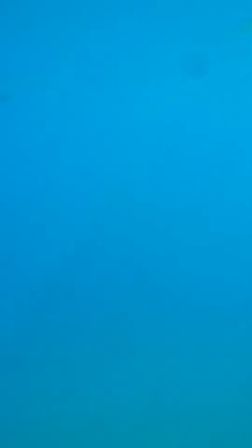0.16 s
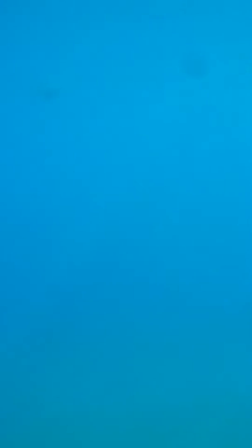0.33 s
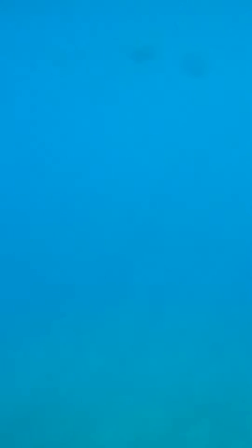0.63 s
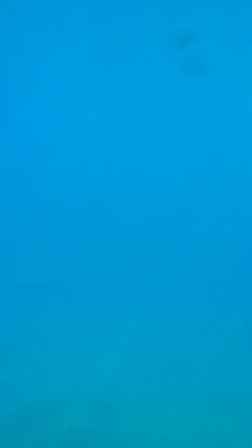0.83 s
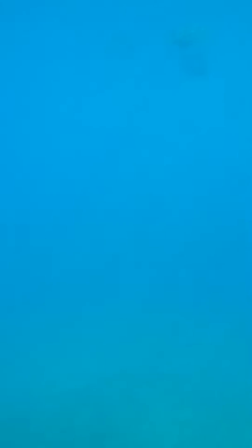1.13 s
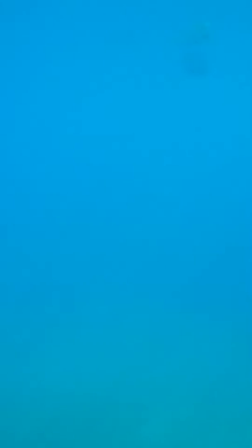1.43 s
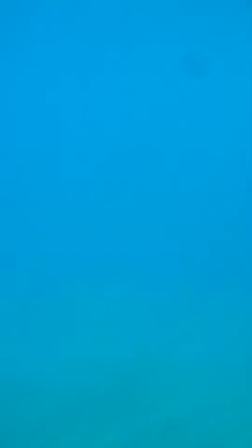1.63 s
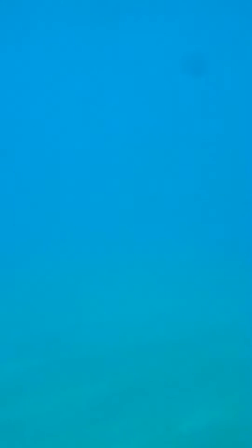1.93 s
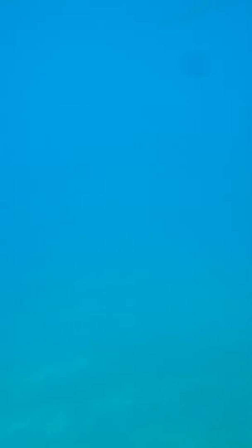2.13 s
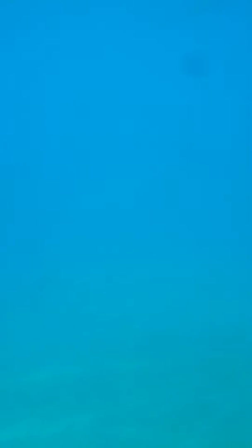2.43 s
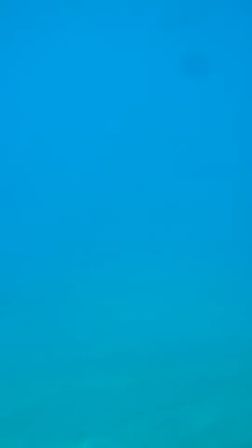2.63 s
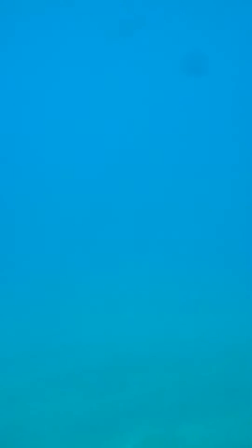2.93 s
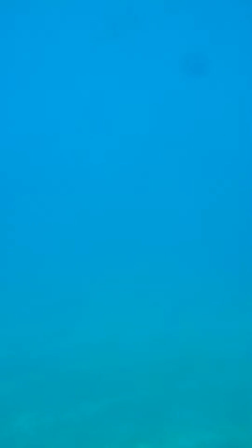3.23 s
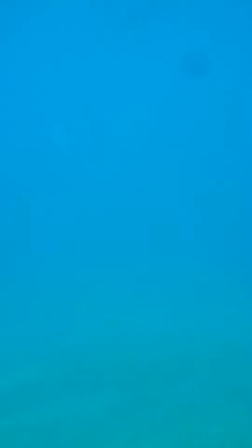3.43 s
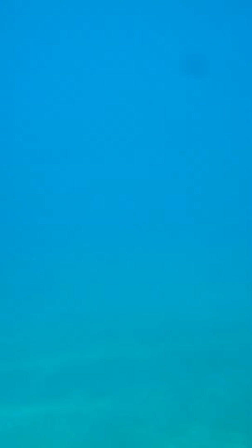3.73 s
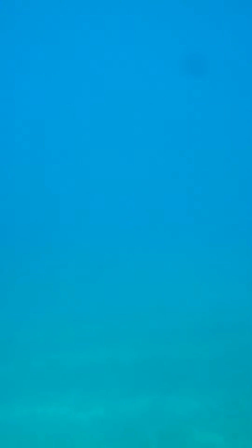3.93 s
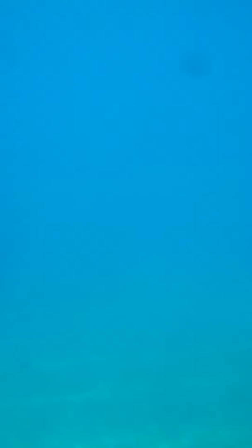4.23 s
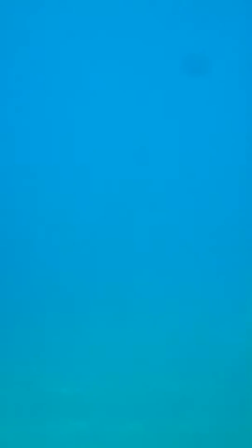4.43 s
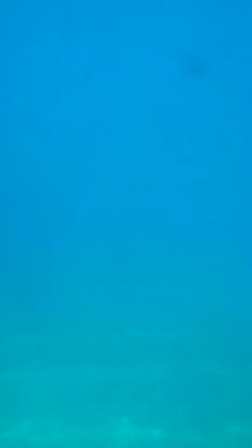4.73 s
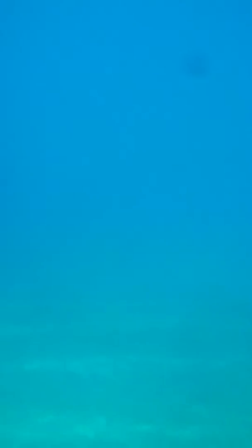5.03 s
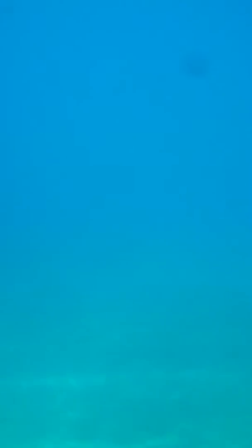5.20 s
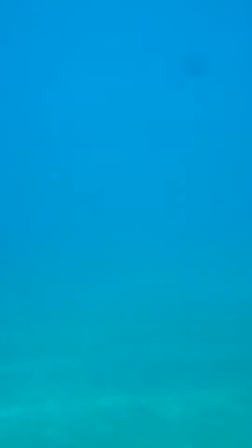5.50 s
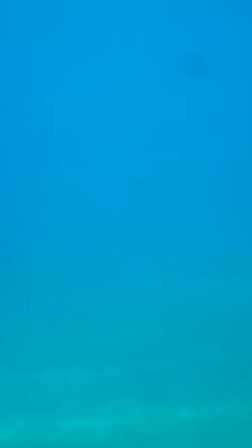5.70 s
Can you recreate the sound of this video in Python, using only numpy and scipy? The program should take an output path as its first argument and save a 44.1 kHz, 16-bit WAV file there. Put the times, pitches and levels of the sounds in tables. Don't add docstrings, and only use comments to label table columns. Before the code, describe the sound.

A muffled stereo pickup inside a sealed underwater housing catches a boat's droning engine and propeller. Rough, rattling hum comes first, with several deep bubble blips, then a cluster of crackles and bubbles around two seconds. The boat turns away, losing its bright gear rattle while trapped air makes the low tone slide and swell. One big bubble thumps after four seconds, then the slightly slower drone strengthens. Fine snaps tick over everything.

```python
import sys
import numpy as np
from scipy import signal
from scipy.fft import rfft, irfft
from scipy.io import wavfile
from scipy.ndimage import uniform_filter1d, minimum_filter1d

SR = 44100
rng = np.random.default_rng(int(sys.argv[2]) if len(sys.argv) > 2 else 0)


def decibels_to_gain(level_db):
    exponent = np.asarray(level_db, float) / 20
    return 10 ** exponent


def transcribe(signal):
    frames = np.atleast_2d(signal).T
    limited = np.clip(frames, -1, 1)
    pcm = np.round(limited * 32767).astype(np.int16)
    wavfile.write(sys.argv[1], SR, pcm)


N = 258426

# time in seconds, speed in turns per second.
SHAFT_SPEED = [(0.0, 29.15), (0.24, 29.51), (0.49, 29.51), (1.22, 29.44), (1.71, 29.34), (1.95, 29.7),
               (2.2, 29.66), (2.69, 29.55), (2.93, 29.08), (3.17, 29.06), (3.91, 29.73), (4.4, 29.55),
               (4.64, 29.17), (5.13, 28.77), (5.62, 28.68), (5.86, 28.52)]
# time in seconds, level in dB.
FIRING_LEVEL = [(0, 0.5), (.3, 2), (.82, -2.5), (1.4, 1), (1.8, -2.5), (2.22, 3.5), (2.42, -0.5), (3.1, 2),
                (3.7, -0.5), (4.15, 0), (4.45, -5.5), (4.9, -3), (5.3, -1.5), (5.58, 0), (5.86, -2)]
# time in seconds, nearness in dB, turned away from 0 to 1.
BOAT_COURSE = [
    (0, 3, 0.05),
    (1.0, -2, 0.13),
    (1.66, -1, 0.11),
    (2.6, 2, 0.23),
    (3.15, -1.5, 0.57),
    (3.4, 0.5, 0.9),
    (4.2, -1, .95),
    (4.8, -2.5, .99),
    (5.2, 0, 0.7),
    (5.86, 2.5, 0.6),
]
# time in seconds, resonance in Hz, coupling in dB.
TRAPPED_AIR = [(0.0, 151.3, -9.5), (0.19, 166, -1.9), (0.85, 206.3, -8.5), (1.32, 178.3, -9),
               (1.44, 224.5, -6), (1.7, 224.3, -0.5), (2.2, 231, 2), (2.59, 236, 1.3), (3.14, 216, 5.5),
               (3.52, 260.7, -4), (3.91, 237.7, 6.5), (4.04, 203.4, 2), (4.33, 162.8, 4.5),
               (4.75, 215, 2.8), (4.9, 254.8, 6), (5.22, 266, 10.5), (5.46, 187.2, 6.5), (5.86, 190.2, 6.5)]
# multiple of shaft speed, level through the housing wall in dB,
# level at the peak of the trapped air in dB.
MAIN_ORDERS = [(5, -32, -40.5), (6, -15.0, -23), (7, -27.5, -18.5), (8, -32.5, -25), (9, -49.5, -28.5),
               (10, -50, -29)]
# multiple of shaft speed, level in dB, change when turned away in dB.
FAINT_ORDERS = [(1, -54, -0.5), (2, -51, 0.5), (4, -39.5, 3.5), (11, -56, 0), (12, -42, -9.5),
                (13, -43, -8.5), (14, -52.5, 2)]
# level in dB, share of
# nearness, change when turned away in dB, share of housing coupling, share of the echo's bend.
HULL_PARTS = [(-49, 2.9, 2.5, 0.45, 0.14), (-46.5, 1.3, 7.5, .05, .1), (-44, 0.96, 0.5, .4, 1),
              (-41, 0.72, -17.5, 0.046, 0.97), (-41, 0.67, -13.5, 0.055, 0.099)]
# index of the hull part, frequency in Hz, width in Hz, level in dB.
HULL_PANELS = [(0, 780, 65, 3.5), (0, 640, 89.5, -6), (1, 930, 60, 3.5), (1, 1040, 60, 6.5),
               (2, 1150, 77.7, 8), (3, 1929, 45.2, 6), (3, 2020, 50.3, -0.5), (3, 1850, 40, -5),
               (4, 1541, 27, -5.5), (4, 559, 50.1, -3.5), (3, 1803, 72, -8), (1, 2325, 140, -9.5),
               (1, 3077, 69, -20), (3, 2692, 60, -14)]
# time in seconds, pitch ratio.
ECHO_BEND = [(0, 0.99), (.95, 0.98), (2.0, 1.008), (2.35, .99), (2.9, .99), (3.15, .945), (3.6, .97),
             (4.3, .975), (5.2, 0.99), (5.86, 0.98)]
# level in dB, share of nearness, change when turned away in dB.
CAVITATION = [(-50, 1, -1), (-52, 0.99, -.5)]
# frequency in Hz, level in dB per Hz.
BODY_SPECTRUM = [(20, -2.5), (45, -10), (80, 9.5), (140, 19), (280, 9), (350, 1.5), (470, -11.5),
                 (800, -10.5), (1200, -8.5), (1350, -13), (2000, -13.5), (2300, -14), (2800, -20),
                 (3400, -42), (6000, -69)]
# frequency in Hz, level in dB per Hz.
HISS_SPECTRUM = [(2500, -17.5), (3000, 2), (4300, -3), (5000, -5.5), (6300, 3), (7500, -7.5), (9000, -22.5),
                 (11200, -26), (12000, -33), (14600, -29.5), (15500, -58.5)]
# start in seconds, peak in dB, pitch in Hz, 60 dB decay in seconds.
BUBBLES = [(0.081, -13, 164, 0.07), (0.125, -17.5, 159, 0.1), (.455, -6.5, 159.3, 0.2),
           (.865, -35, 709, 0.1), (0.911, -17, 157.6, .15), (1.085, -33, 830, 0.085),
           (1.11, -31, 718, 0.11), (1.12, -31.5, 613, 0.089), (1.69, -20.5, 161, 0.57),
           (1.689, -29.5, 60, .2), (2.24, -34, 926, 0.13), (2.34, -23, 412, 0.049),
           (2.342, -14, 326, 0.055), (2.469, -20.5, 408, 0.048), (2.47, -10.5, 322, 0.039),
           (2.739, -30.5, 893, 0.17), (2.752, -19, 167, 0.14), (3.585, -13.5, 158.6, 0.14),
           (4.116, -3.5, 178, 0.082), (3.31, -32.5, 428, .07), (3.29, -26, 905, 0.12),
           (5.2, -28, 1140, 0.21), (5.6, -32.5, 1025, 0.21), (4.36, -38.5, 722, .1), (5.59, -22, 286, .2)]
# start in seconds, peak in dB, pitch in Hz, left over right in dB.
NEAR_SNAPS = [(0.1605, -33.5, 4480, 6), (0.3437, -24.5, 5740, 8), (1.6807, -28.5, 6200, 7),
              (1.8108, -29.5, 7060, 2.5), (2.0076, -28, 6230, 6.5), (2.1172, -35.5, 6490, 9),
              (2.2302, -24, 5970, 1), (2.257, -23.5, 7080, 4.5), (2.3334, -31.5, 6440, 10),
              (2.5338, -34, 5410, 5.5), (2.721, -41, 5880, -6), (2.7376, -30.5, 6100, 11),
              (2.938, -32, 6700, -0.5), (3.0283, -31, 6400, 3.5), (3.2859, -35, 6100, 1),
              (3.4302, -40, 4900, 1.5), (3.682, -31.5, 7150, 6), (3.699, -31, 6090, 3.5),
              (3.9435, -35.5, 7100, 5.5), (4.0654, -37, 6970, 3), (4.2782, -33, 7040, 1),
              (4.3293, -29.5, 7070, 0.5), (4.368, -33.5, 7100, 4.0), (4.9192, -31.5, 6860, -2.5),
              (5.0574, -36, 6130, 3.5), (5.3747, -32, 5910, 5.5), (5.448, -24, 6030, 5.5),
              (5.5807, -22, 6770, 5.5), (5.6374, -28, 7340, 1)]
# start in seconds, peak in dB.
FAR_SNAPS = [(0.1579, -31.5), (0.4418, -37.5), (0.702, -36.5), (0.8302, -36), (1.4579, -39), (1.5586, -36),
             (1.585, -40), (2.4308, -38), (2.5785, -37.5), (2.8515, -37), (2.9005, -38.5), (3.108, -39),
             (3.269, -36.5), (3.3918, -36), (3.5056, -34.5), (3.6267, -41.5), (4.1062, -39), (4.4602, -37),
             (4.5394, -37.5), (4.6332, -38), (5.23, -37), (5.3492, -39.5), (5.761, -39.5)]
# frequency in Hz, level in dB, lag in radians,
# likeness from 0 to 1.
PORT_DIFFERENCE = [(60, -0.9, 0, 0.95), (300, -0.75, 0, 1), (410, -1, 0.42, 1), (440, 5, 0.5, 1),
                   (640, 4, 1, .72), (770, -0.5, 2, 0.99), (1150, -10.5, 3, 0.85), (1610, -2.5, 5, 1),
                   (1960, -4.5, 4.5, 0.3), (2380, 2, 5, 0.99), (2900, 1.5, 5.5, 0), (4680, -16.5, 8, 1),
                   (5960, -13.5, 4, 0.04), (7200, 7, 10, 0.2), (15100, 0.5, 6, 0)]
# frequency in Hz, share lost from 0 to 1.
TREBLE_LOSS = [(7800, 0), (9500, .45), (11200, .6), (11500, .95), (13000, .94), (13500, .84), (14700, .82),
               (14900, .99)]


def shaft():
    crank_rad = 0.15
    return crank_rad + 2 * np.pi * np.cumsum(columns(SHAFT_SPEED)[0]) / SR


def orders(wobble_rad=0.15, wobble_hz=9.0):
    exhaust_db, exhaust_turned_db = -23.5, -15
    air_width_hz, air_lag = 21, 0.7
    ring_rad, lope = -2.8, 0.08
    speed, firing_db = columns(SHAFT_SPEED)[0], columns(FIRING_LEVEL)[0]
    air_hz, air_db = columns(TRAPPED_AIR)
    turned = columns(BOAT_COURSE)[1]
    lines = [(3, decibels_to_gain(exhaust_db + firing_db + exhaust_turned_db * turned))]
    for k, wall_db, peak_db in MAIN_ORDERS:
        off = (round(k) * speed - air_hz) / air_width_hz
        through_wall = decibels_to_gain(wall_db + firing_db)
        through_air = decibels_to_gain(peak_db + air_db) / (1 + off ** 2) * np.exp(-1j * air_lag * np.arctan(off))
        lines.append((k, through_wall + through_air))
    for k, db, away_db in FAINT_ORDERS:
        lines.append((k, decibels_to_gain(db + away_db * turned)))
    wander = wobble_rad * drift(wobble_hz, len(lines))
    angle = shaft()
    hum = np.zeros(N)
    for (k, gain), wobble in zip(lines, wander):
        hum += (gain * np.exp(1j * (round(k) * angle + ring_rad + wobble))).real
    return np.sqrt(2) * (1 + lope * np.cos(angle / 2)) * hum


def rumble(width_hz=54.1):
    rumble_db, coupling, rest_hz, slide = -20.5, 0.23, 207.6, 0.5
    overtone_ratio, overtone_db, overtone_width_hz, overtone_coupling = 1.687, -44, 100, 0.09
    air_hz, air_db = columns(TRAPPED_AIR)
    gusts = (1 + 0.4 * np.cos(shaft())) * rng.standard_normal(N)
    hz = rest_hz + slide * (air_hz - rest_hz)
    lower = evened(resonate(resonate(gusts, hz, width_hz), hz, 2.67 * width_hz))
    upper = evened(resonate(gusts, overtone_ratio * air_hz, overtone_width_hz))
    return decibels_to_gain(rumble_db + coupling * air_db) * lower + decibels_to_gain(overtone_db + overtone_coupling * air_db) * upper


def hull(tuned_speed=29.5, tick_db=-14.5, tick_hz=4300.0, uneven_db=2.5):
    gear_sag, knock_db, patchy_db = 0.045, 11, 1.2
    turns = shaft() / (2 * np.pi) + 0.0012 * drift(4.0, 1)[0]
    teeth = rng.standard_normal((2, 3001))
    mesh = np.array([np.interp(turns / 2 % 1 * 3000, np.arange(3001), row) for row in teeth])
    drive = throb(0.16) * (1.5 * evened(mesh) + rng.standard_normal((2, N)))

    near_db, turned = columns(BOAT_COURSE)
    air_db, bend = columns(TRAPPED_AIR)[1], columns(ECHO_BEND)[0]
    speed_ratio = columns(SHAFT_SPEED)[0] / tuned_speed
    level_db, shift = [], []
    for db, near, away_db, air, bend_share in HULL_PARTS:
        level_db.append(db + near * near_db + away_db * turned + air * air_db)
        shift.append(speed_ratio + bend_share * (bend - speed_ratio))
    shift[3] = shift[3] - gear_sag * turned

    bands = np.zeros((2, N))
    patches_db = patchy_db * drift(4.0, len(HULL_PANELS))
    for (part, hz, width_hz, db), patch_db in zip(HULL_PANELS, patches_db):
        part = round(part)
        ring = evened(resonate(drive, hz * shift[part], width_hz))
        bands += decibels_to_gain(db + level_db[part] + patch_db) * ring

    count = np.floor(4 * turns - 0.2)
    strike = decibels_to_gain(uneven_db * rng.standard_normal(N) + knock_db * (count % 8 == 7))
    beats = (np.diff(count, prepend=0) > 0) * strike
    ticks = decibels_to_gain(tick_db + level_db[3]) * evened(resonate(beats, tick_hz, 600))
    return dull(bands, 4300) + dull(ticks, 6500)


def wash(body_gain_db=26.5, hiss_gain_db=3.0, flicker_db=1.1, grains=340.0, grain_db=7.5, grain_share=0.5):
    course = columns(BOAT_COURSE)
    body_db, hiss_db = (db + np.dot([near, away_db], course) for db, near, away_db in CAVITATION)
    body = evened(colour(rng.standard_normal((2, N)), BODY_SPECTRUM))
    grain_size = np.minimum(rng.exponential(1, (2, N)), 3)
    grit = (rng.random((2, N)) < grains / SR) * decibels_to_gain(grain_db * grain_size)
    hiss = evened(colour(rng.standard_normal((2, N)) + grain_share * evened(grit), HISS_SPECTRUM))
    flicker = decibels_to_gain(flicker_db * drift(60.0, 1)) * throb(0.08)
    return decibels_to_gain(body_gain_db + body_db) * body + decibels_to_gain(hiss_gain_db + hiss_db) * flicker * hiss


def thumps(rise_s=0.0041):
    out, t = np.zeros(N), np.arange(SR // 4) / SR
    for s, db, hz, t60 in BUBBLES:
        swell = 1 - np.exp(-(t / rise_s) ** 2)
        ring = decibels_to_gain(db + 7.5 - 60 * t / t60) * swell * np.sin(2 * np.pi * hz * t)
        spot = out[round(s * SR):][:len(t)]
        spot += ring[:len(spot)]
    return out


def snaps(ring_t60=0.011, tail_db=-9.0, tail_t60=0.09, treble_gain_db=-8.5, low_gain_db=14.0, pan_shift_db=1.0):
    crack_t60, crack_hz, crack_db = 0.0015, 13000, -21
    out, t, sides = np.zeros((2, N + SR)), np.arange(SR // 10) / SR, np.array([[0.5], [-0.5]])
    low, band, treble = (signal.butter(3, edges, "bandpass", fs=SR, output="sos")
                         for edges in ([2400, 4400], [4000, 7600], [8000, 15000]))
    rows = [(*row, -27.5, -14.5) for row in NEAR_SNAPS]
    rows += [(*row, 6200, 0.5, -16.5, -12) for row in FAR_SNAPS]
    noises = rng.standard_normal((len(rows), 2, len(t)))
    decay = decibels_to_gain(-60 * t / ring_t60)
    tail = decibels_to_gain(tail_db - 60 * t / tail_t60)
    crack = decibels_to_gain(crack_db - 60 * t / crack_t60) * np.sin(2 * np.pi * crack_hz * t)
    for (s, db, hz, pan_db, treble_db, low_db), noise in zip(rows, noises):
        burst = noise * (decay + tail)
        snap = signal.sosfilt(band, decay * np.sin(2 * np.pi * hz * t) + burst)
        snap += decibels_to_gain(treble_db + treble_gain_db) * signal.sosfilt(treble, burst)
        snap += crack
        snap += decibels_to_gain(low_db + low_gain_db) * signal.sosfilt(low, burst)
        out[:, round(s * SR):][:, :len(t)] += decibels_to_gain(db + 1.0 + sides * (pan_db - pan_shift_db)) * snap
    return out[:, :N]


def throb(depth):
    angle = shaft()
    return 1 + depth * (np.cos(angle) + np.cos(2 * angle) + 0.88 * np.cos(angle / 2))


def dull(x, hz):
    return signal.sosfilt(signal.butter(4, hz, fs=SR, output="sos"), x)


def ports(direct, other):
    fade = signal.windows.tukey(N + 8192, 8192 / N)
    padded = np.pad([direct, other], ((0, 0), (4096, 4096)), "reflect", reflect_type="odd")
    shared, unrelated = rfft(fade * padded)
    right_db, lag, same = read(PORT_DIFFERENCE, np.fft.rfftfreq(len(fade), 1 / SR))
    same = np.clip(same, 0, 1)
    mixed = same * shared + np.sqrt(1 - same ** 2) * unrelated
    right = irfft(decibels_to_gain(right_db) * np.exp(-1j * lag) * mixed, len(fade))
    return np.array([direct, right[4096:-4096]])


def thinned(x, whim_db=13.0, coarse_db=13.0):
    hz, _, z = signal.stft(x, SR, nperseg=2048, noverlap=1024)
    share = read(TREBLE_LOSS, hz)[0][:, None]
    whim = decibels_to_gain(whim_db * rng.standard_normal(z.shape))
    merit = uniform_filter1d(abs(z) ** 2 * whim, size=11, axis=1)
    rank = (share * z.shape[2]).astype(int)[None]
    cut = np.take_along_axis(np.sort(merit, axis=2), rank, axis=2)
    kept = z * (merit >= cut) * decibels_to_gain(coarse_db * share)
    return signal.istft(kept, SR, nperseg=2048, noverlap=1024)[1][:, :N]


def evened(x):
    return x / np.sqrt(np.mean(x ** 2) + 1e-20)


def columns(rows):
    s, *rest = np.transpose(rows)
    return [np.interp(np.arange(N) / SR, s, c) for c in rest]


def read(points, hz):
    f, *rest = np.transpose(points)
    return [np.interp(np.log(hz + 1), np.log(f + 1), c) for c in rest]


def colour(x, points):
    return irfft(rfft(x) * decibels_to_gain(read(points, np.fft.rfftfreq(N, 1 / SR))[0]), N)


def resonate(x, hz, width_hz):
    turn = np.exp(2j * np.pi * np.cumsum(hz * np.ones(N)) / SR)
    r = np.exp(-np.pi * width_hz / SR)
    smooth = signal.lfilter([(1 - r) ** 2], [1, -2 * r, r * r], x / turn)
    return 2 * (turn * smooth).real


def drift(rate_hz, rows):
    step = max(int(SR / rate_hz), 1)
    held = np.repeat(rng.standard_normal((rows, N // step + 1)), step, axis=1)[:, :N]
    return evened(uniform_filter1d(held, step))


def scene():
    spread = hull() + wash() + snaps()
    low = dull(orders(), 3500) + dull(rumble(), 830) + dull(thumps(), 2500)
    return ports(decibels_to_gain(1.0) * low + spread[0], spread[1])


def roll_off(x):
    return signal.sosfilt(signal.butter(12, 15960, fs=SR, output="sos"), x)


def record(dry):
    room = np.minimum(0.94 / (abs(dry).max(axis=0) + 1e-9), 1)
    limited = dry * uniform_filter1d(minimum_filter1d(room, size=801), size=801)
    limited *= np.minimum(np.arange(N)[::-1] / 300, 1)
    return roll_off(thinned(limited))


dry = scene()
out = record(dry)
transcribe(out)
```